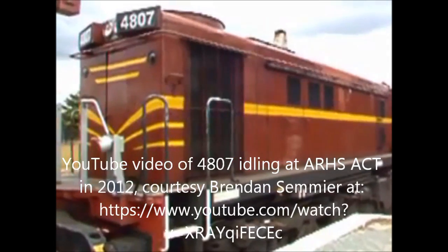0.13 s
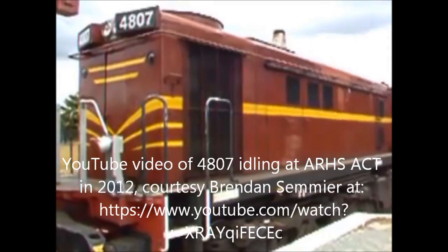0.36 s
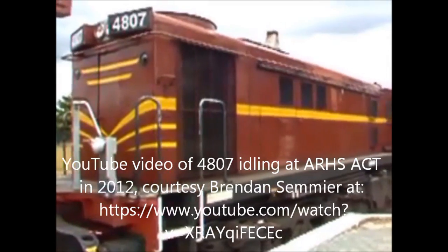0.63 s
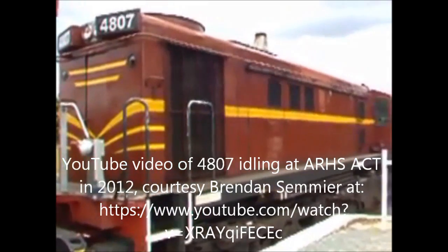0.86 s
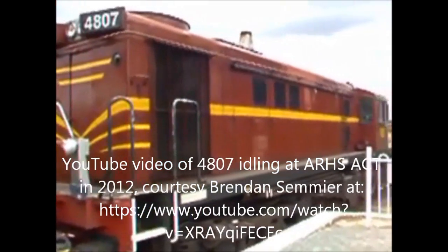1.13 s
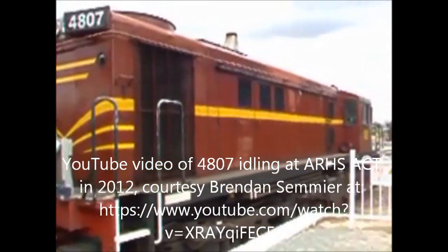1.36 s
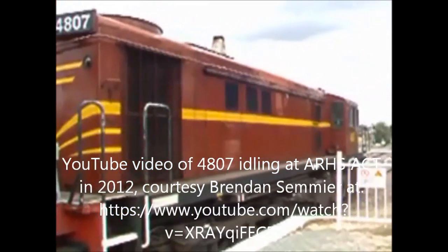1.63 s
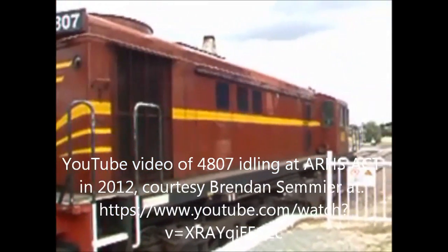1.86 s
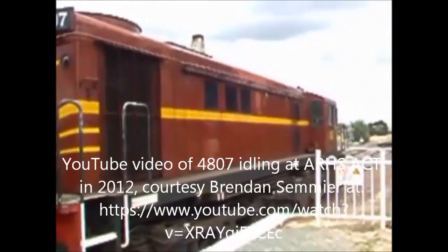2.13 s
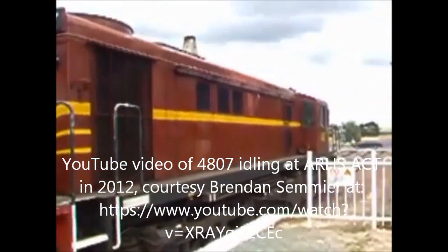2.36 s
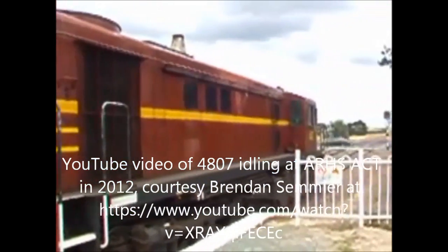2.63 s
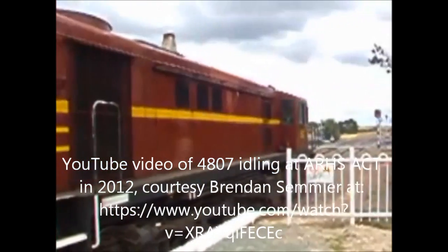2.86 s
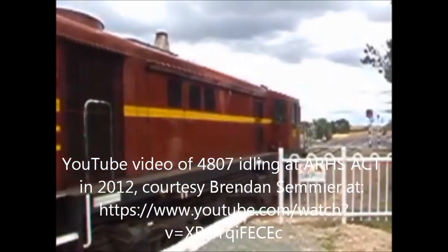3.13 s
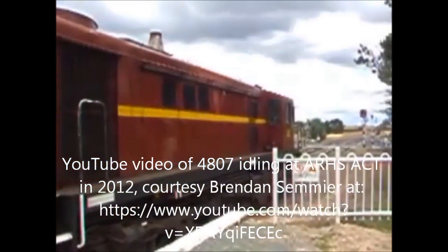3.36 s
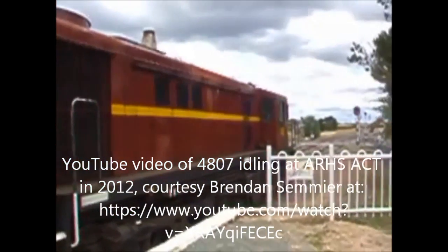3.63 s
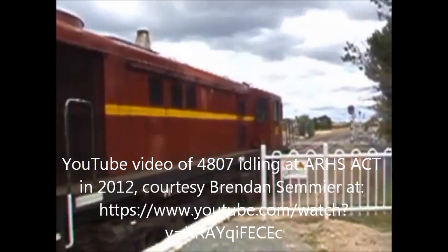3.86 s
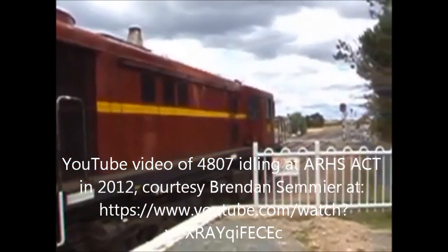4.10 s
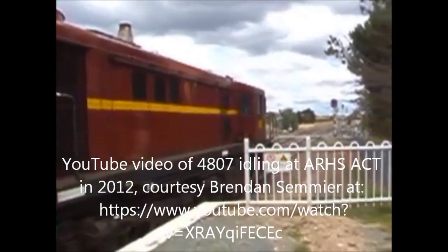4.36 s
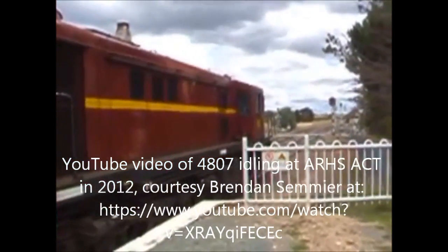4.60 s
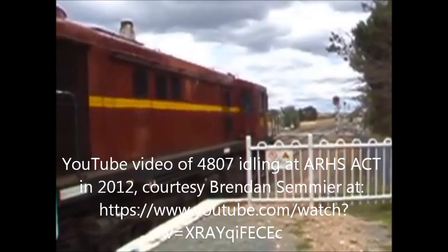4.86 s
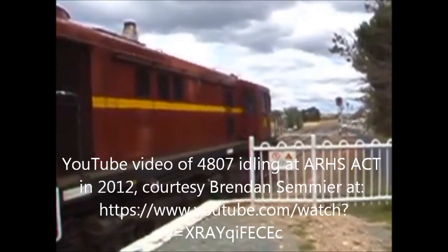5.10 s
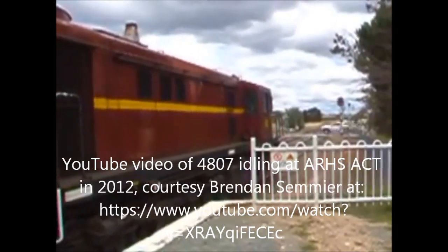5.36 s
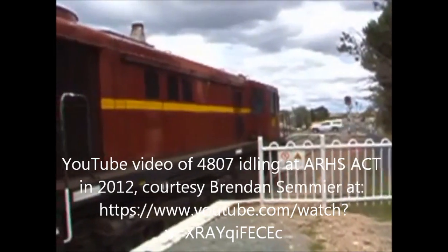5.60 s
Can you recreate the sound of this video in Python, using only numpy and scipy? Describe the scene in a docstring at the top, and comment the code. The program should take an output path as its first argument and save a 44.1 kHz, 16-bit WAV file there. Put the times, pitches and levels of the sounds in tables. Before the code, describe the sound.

A big diesel locomotive idles close by with a fast, even, throbbing clatter, soft rhythmic chuffs, fan rush, faint whine and squeaks.

```python
"""A six-cylinder diesel locomotive idles beside a platform, heard close by in open air on a small microphone.
Exhaust puffs ring the pipe and two blows each crank turn thump the hollow hood; knocks ring frame, block
and cylinder heads. Gated hiss makes light valve ticks and one leaky chuff a cycle, which jolts a loose cover.
Behind lie a gear whine of wavering sines, a rush of shaped noise, and set squeaks and metal pings."""
import sys
import numpy as np
from scipy import signal
from scipy.io import wavfile
from scipy.ndimage import uniform_filter1d

SR = 44100
rng = np.random.default_rng(int(sys.argv[2]) if len(sys.argv) > 2 else 0)


def gain_from_decibels(decibels):
    """Convert decibel values to linear amplitude factors."""
    exponent = np.asarray(decibels, float) / 20
    return 10 ** exponent


def digitize_waveform(pressure):
    """Quantize a signal to 16-bit integers and store it at the path in sys.argv[1].

    Rows of a 2-D input are taken as channels; values are limited to [-1, 1].
    """
    field = np.atleast_2d(pressure).T
    bounded = np.clip(field, -1, 1)
    quanta = np.round(bounded * 32767).astype(np.int16)
    wavfile.write(sys.argv[1], SR, quanta)


N = 252693  # length in samples

IDLE_RPM, CREEP_RPM_PER_S, START_DEG = 362.93, .5556, 1.57  # the idle creeps up slowly


def rpm(t):
    """Crank speed at times t."""
    return IDLE_RPM + CREEP_RPM_PER_S * t


def moments(degrees):
    """Times of crank angles in every four-stroke cycle (two turns): cycles x angles."""
    t = np.arange(-SR, N + SR) / SR
    mean_rpm = (rpm(0) + rpm(t)) / 2
    turned_deg = START_DEG + 6 * t * mean_rpm
    cycle_deg = 720 * np.arange(-3, 19)[:, None]
    return np.interp(cycle_deg + np.asarray(degrees), turned_deg, t)


def train(times, sizes, lead=0):
    """Single-sample blows on a line that begins lead samples early."""
    at = np.round(np.ravel(times) * SR).astype(int) + lead
    inside = (at >= 0) & (at < N + lead)
    sizes = np.ravel(sizes * np.ones(np.shape(times)))
    blows = np.zeros(N + lead, complex)
    np.add.at(blows, at[inside], sizes[inside])
    return blows


def ring(blows, hz, t60):
    """A decaying sine after each blow; a complex blow sets its phase."""
    pole = np.exp((2j * np.pi * hz - np.log(1000) / t60) / SR)
    return signal.lfilter([1], [1, -pole], blows).imag


def struck(degrees, db, modes, uneven_db, slop_s):
    """Blows on one body, a little uneven in force and timing from cycle to cycle."""
    times = moments(degrees)
    force, slop = rng.standard_normal((2, *times.shape))
    blows = train(times + slop_s * slop, gain_from_decibels(np.asarray(db) + uneven_db * force), lead=SR)
    rung = sum(height * ring(blows, hz, t60) for hz, height, t60 in modes)
    return rung[SR:]  # already ringing at the start


def band(hz, width):
    """Noise in one twice-applied resonance, rms 1."""
    once = ring(rng.standard_normal(N), hz, 2.2 / width)
    twice = ring(once, hz, 2.2 / width)
    return twice / twice.std()


def burst(blows, rise, fall):
    """An envelope of peak near 1 after each unit blow, swelling softly; time constants in s."""
    t = np.arange(SR // 5) / SR
    shape = (1 - np.exp(-t / rise)) ** 3 * np.exp(-t / fall)
    return signal.oaconvolve(blows.real, shape / shape.max())[:N]


def unit_drift(samples):
    """Two slow random curves, smoothed over so many samples, each of rms about 1."""
    return [v / v.std() for v in uniform_filter1d(rng.standard_normal((2, N)), samples, axis=1)]


# air noise of fans and intake, deep part: pitch_hz, level_db (per Hz, before the rise in level)
RUMBLE = [(20, -56), (60, -62), (100, -61), (155, -57)]
# the same air noise, upper part: pitch_hz, level_db (per Hz, before the rise in level)
RUSH = [(210, -49), (300, -50.5), (400, -47.5), (505, -42), (670, -55.5), (966, -55), (1570, -63),
        (2000, -64), (2300, -71), (3450, -65), (5060, -70.5), (6460, -67), (7850, -72.5), (8500, -91)]
RUSH_START_DB, RUSH_DB_PER_S = -1.15, 0.3358  # fans swell as the idle creeps up


def rush(patchy_db=1.1):
    """Air noise of fans and intake: random short-time spectra with drifting patches."""
    frames, hz = N // 256 + 5, np.fft.rfftfreq(1024, 1 / SR)
    real, imag, patches = rng.standard_normal((frames, 513, 3)).T
    patches = uniform_filter1d(uniform_filter1d(patches, 8, 0), 8, 1)
    f, db = np.transpose(RUMBLE + RUSH)
    colour = np.interp(np.log(hz + 1), np.log(f), db, right=-130)[:, None]
    spectra = (real + 1j * imag) * gain_from_decibels(colour + patchy_db * patches / patches.std())
    air = signal.istft(spectra, nperseg=1024, noverlap=768)[1][:N]
    rms = np.sqrt(np.sum(gain_from_decibels(colour) ** 2) * hz[1])
    rise = gain_from_decibels(RUSH_START_DB + RUSH_DB_PER_S * np.arange(N) / SR)
    return rise * rms * air / air.std()


# gear tones: ratio (to the main tone), level_db (relative to WHINE_DB), waver_hz (rms)
WHINE = [(1, 0, 1.5), (1.657, -10, 2)]
GEAR_TEETH, WHINE_DB = 237.3, -38  # tooth contacts per crank turn; main tone, dB rms before its swell


def whine(swell_db=1.5):
    """Gear tones that follow the crank and waver in pitch and strength."""
    main_hz = GEAR_TEETH * rpm(np.arange(N) / SR) / 60
    out = np.zeros(N)
    for ratio, db, waver_hz in WHINE:
        drift, swell = unit_drift(3000)
        turns = np.cumsum(ratio * main_hz + waver_hz * drift) / SR
        level = np.sqrt(2) * gain_from_decibels(WHINE_DB + db + swell_db * swell)
        out += level * np.sin(2 * np.pi * turns)
    return out


# stray metal pings: start_s, level_db (before a common factor), pitch_hz, t60_s
PINGS = [(0.475, -29, 1760, .06), (1.15, -23.5, 1980, .08), (1.2241, -24, 2010, .07),
         (1.623, -23.5, 1173, 0.4), (3.6301, -21, 1180, .15), (3.8546, -29, 2080, .08),
         (4.4914, -20, 1860, .05), (5.016, -27.5, 1200, 0.15), (5.2618, -25, 1177, .24),
         (5.3512, -22.5, 4040, 0.077)]


def pings():
    """Loose metal rings now and then, each ping one decaying sine."""
    return sum(gain_from_decibels(db) * ring(train([s], 0.92), hz, t60) for s, db, hz, t60 in PINGS)


# squeaks of a valve stem: start_s, level_db (before flutter)
SQUEAKS = [(0.738, -34), (1.393, -31), (1.736, -26.5), (2.092, -33.5), (3.138, -34), (3.377, -27.5),
           (3.701, -30), (4.038, -30.5), (4.373, -32), (5.043, -32), (5.355, -28.5)]
SQUEAK_HZ, SQUEAK_S = 3440, .036  # mean pitch, length
SQUEAK_UPPER, SQUEAK_UPPER_DB = 1.14, -7  # a second, fainter note: ratio, relative dB


def squeaks(spread_hz=30, flutter_db=3.5):
    """A valve stem squeaks on two notes that flutter in strength while it slides."""
    t = np.arange(N) / SR
    grip, upper_grip = (gain_from_decibels(flutter_db * v) for v in unit_drift(300))
    out = np.zeros(N)
    for s, db in SQUEAKS:
        slide = np.clip((t - s) / SQUEAK_S, 0, 1)
        hz = SQUEAK_HZ + spread_hz * rng.standard_normal()
        note = grip * np.sin(2 * np.pi * hz * t)
        upper = gain_from_decibels(SQUEAK_UPPER_DB) * upper_grip * np.sin(2 * np.pi * SQUEAK_UPPER * hz * t)
        out += gain_from_decibels(db) * np.sin(np.pi * slide) ** .6 * (note + upper)
    return out


# valve cover jolted by the chuff: pitch_hz, level_db (mean force), t60_s
COVER = [(1766, -30, 0.09), (1998, -28, .09), (2784, -30, .075), (3926, -35, 0.042)]
COVER_DEG = 10  # crank angle of the jolt


def cover(uneven_db=4, slop_s=.004, rise_s=.02):
    """Each chuff jolts the loose cover, catching its modes softly and differently every time."""
    s = moments([COVER_DEG])[:, 0]
    force, slop = rng.standard_normal((len(s), len(COVER), 2)).T
    out = np.zeros(N)
    for hard, late, (hz, db, t60) in zip(force, slop, COVER):
        jolts = train(s + slop_s * late, gain_from_decibels(db + uneven_db * hard))
        out += ring(jolts, hz, t60) - ring(jolts, hz, rise_s)  # the difference swells in softly
    return out


# valve ticks of each cylinder: crank_deg (after its turn begins), low_db, mid_db, high_db (one per band)
TICKS = [(8, -35.5, -37.5, -45.5), (55, -31.5, -36, -48), (97, -34, -38, -44.5)]
# the three bands of hiss: pitch_hz, width_hz
TICK_BANDS = [(2100, 2900), (3800, 2100), (6900, 2500)]
# how loudly each cylinder ticks: level_db (added to TICKS)
CYLINDER_DB = [-6, 0, -2, -1, -4.5, -4]
# the leaky chuff in the highest band, cycle by cycle: level_db
CHUFFS = [-26, -26, -25, -22.5, -24, -26, -23.5, -22, -27, -24.5, -27.5, -27, -27.5, -25.5, -27, -26.5,
          -27.5, -24]
CHUFF_DEG, CHUFF_RISE_S, CHUFF_FALL_S = -3., .018, .006  # crank angle, time constants
CHUFF_LOW_DB, CHUFF_MID_DB = -30.5, -29.5  # mean level in the two lower bands


def valves(uneven_db=3, colour_db=2.2):
    """Leaky chuffs and valve ticks gate three bands of hiss."""
    degrees, *ticks = np.transpose(TICKS)
    tick_times = moments((120 * np.arange(6)[:, None] + degrees).ravel())
    force_db = uneven_db * rng.standard_normal(tick_times.shape) + np.repeat(CYLINDER_DB, len(TICKS))
    chuff_times = moments([CHUFF_DEG])[3:3 + len(CHUFFS), 0]  # row 3 is the first cycle
    chuff_times = np.maximum(chuff_times, 0)
    low, mid = colour_db * rng.standard_normal((len(chuff_times), 2)).T
    chuffs = (CHUFF_LOW_DB + low, CHUFF_MID_DB + mid, CHUFFS)
    out = np.zeros(N)
    for (hz, width), tick_db, chuff_db in zip(TICK_BANDS, ticks, chuffs):
        tick_sizes = gain_from_decibels(np.tile(tick_db, len(CYLINDER_DB)) + force_db)
        gate = burst(train(tick_times, tick_sizes), .005, .008)
        gate += burst(train(chuff_times, gain_from_decibels(np.array(chuff_db))), CHUFF_RISE_S, CHUFF_FALL_S)
        out += gate * band(hz, width)
    return out


# knocks of firing and valve gear in one cycle, for heads, frame and block:
# crank_deg, frame_level_db, block_level_db (relative forces)
KNOCKS = [(23.3, -7.8, -11.7), (54.1, 1.8, -11.0), (78.5, -0.5, -18.0), (103.6, -15.6, -1.9),
          (130.9, -13.6, -9.8), (156.2, -4.4, 1.2), (172.1, -18.1, -2.5), (200.5, -2.4, -3.5),
          (230.4, -13.1, -2.9), (252.3, -4.7, -30.0), (283.6, -6.1, -2.4), (299.7, -12.0, -1.4),
          (328.0, 0.9, -18.0), (364.4, -15.8, -6.1), (385.0, -15.9, -2.8), (414.0, -3.8, -4.1),
          (437.8, 3.1, -7.1), (459.0, -6.8, -5.0), (490.1, -21.4, -6.6), (518.4, -30.0, -3.5),
          (533.8, 3.3, -30.0), (576.2, -2.0, -6.1), (619.8, -2.7, -5.5), (675.1, -30.0, -11.5)]
# modes of the cylinder heads: pitch_hz, level_db (relative), t60_s
HEAD = [(715.8, -27.5, 0.1), (800, -30, 0.033), (910, -32, 0.037), (960, -26, 0.11), (1019, -29, .1),
        (1180, -29, 0.029)]


def heads(slop_s=.00015, uneven_db=1.5):
    """Each knock grips each mode in its own way, alike every cycle but for slop in timing and force."""
    degrees, *forces = np.transpose(KNOCKS)
    db = np.max(forces, axis=0)  # the heads feel the harder of the two
    times = moments(degrees)
    times = times + slop_s * rng.standard_normal(times.shape)
    force = gain_from_decibels(db + uneven_db * rng.standard_normal(times.shape))
    grips = np.exp(2j * np.pi * rng.random((len(HEAD), len(degrees))))  # starting phases
    rung = np.zeros(N)
    for grip, (hz, mode_db, t60) in zip(grips, HEAD):
        rung += gain_from_decibels(mode_db) * ring(train(times, force * grip), hz, t60)
    blunt = signal.butter(2, (680, 1250), "band", fs=SR, output="sos")  # blunt blows, no click
    return signal.sosfilt(blunt, rung)


# modes of the frame: pitch_hz, height (signed, relative), t60_s
FRAME = [(232.2, 0.006, 0.449), (250.8, 0.039, 0.449), (277.9, 0.031, 0.449), (330.3, 0.056, 0.449),
         (353.5, 0.066, 0.114), (391.9, 0.046, 0.42)]
# modes of the engine block: pitch_hz, height (signed, relative), t60_s
BLOCK = [(421.3, 0.035, 0.449), (469.2, -0.227, 0.154), (482.1, 0.215, 0.116), (523.1, -0.032, 0.449),
         (561.5, 0.038, 0.333), (604.1, -0.026, 0.449), (672.9, 0.007, 0.327)]


def knocks(frame_db=0., block_db=1.0):
    """Frame and block ring under the valve gear and firing; nothing of them sounds below about 150 Hz."""
    degrees, on_frame, on_block = np.transpose(KNOCKS)
    frame = struck(degrees, on_frame, FRAME, uneven_db=1.2, slop_s=.0001)
    block = struck(degrees, on_block, BLOCK, uneven_db=1.2, slop_s=.00008)
    iron = gain_from_decibels(frame_db) * frame + gain_from_decibels(block_db) * block
    return signal.lfilter(*signal.butter(2, 150, "high", fs=SR), iron)


# a light and a heavy blow each turn: crank_deg, level_db (relative force)
THUMPS = [(48.3, -7.7), (122.0, 0.0), (408.1, -6.4), (480.3, 0.4)]
# modes of the hollow hood: pitch_hz, height (signed, relative), t60_s
HOOD = [(112.2, -0.1, 0.061), (141.9, 0.067, 0.6), (157.3, 0.151, 0.607), (170.0, 0.089, 0.602),
        (179.1, -0.178, 0.223), (199.1, -0.027, 0.607)]


def thump():
    """The hollow hood booms under a light and a heavy blow each crank turn."""
    degrees, db = np.transpose(THUMPS)
    return struck(degrees, db, HOOD, uneven_db=.6, slop_s=.00008)


# exhaust puffs, one row a cylinder, 120 crank degrees apart:
# level_db at the first angle of PUFF_DEG, level_db at the second (relative forces)
PUFFS = [(-20.3, -10.0), (-8.2, -30.5), (-25.5, -0.2), (-0.1, -14.7), (-10.2, 0.0), (-1.6, -30.5)]
# the two puffs in the first row: crank_deg
PUFF_DEG = (12, 120.3)
# modes of the exhaust pipe: pitch_hz, height (signed, relative), t60_s
STACK = [(39.0, -0.021, 0.511), (49.5, 0.15, 0.048), (66.6, -0.034, 0.582), (90.4, -0.136, 0.607)]


def exhaust():
    """Two puffs a cylinder ring the low modes of the exhaust pipe."""
    degrees = np.arange(6)[:, None] * 120 + PUFF_DEG
    return struck(degrees.ravel() % 720, np.ravel(PUFFS), STACK, uneven_db=.4, slop_s=.0001)


def scene():
    """All of the engine, close by in open air, on one channel."""
    background = rush() + whine() + pings() + squeaks()
    metal = cover() + valves() + heads() + knocks()
    mix = background + metal + gain_from_decibels(0.5) * thump() + gain_from_decibels(1.5) * exhaust()
    return mix[None]


def roll_off(x):
    """The treble ends steeply here."""
    return signal.sosfilt(signal.butter(12, 8590, fs=SR, output="sos"), x)


def record(dry):
    """A small microphone: little deep bass, treble cut off steeply."""
    thin = signal.lfilter(*signal.butter(2, 35, "high", fs=SR), dry)
    thin = thin + .0031  # constant offset
    lowpass = signal.firwin(301, 8300, window=("kaiser", 9), fs=SR)
    dull = signal.oaconvolve(thin, lowpass[None], "same")
    return roll_off(dull)


dry = scene()
out = record(dry)
digitize_waveform(out)
```